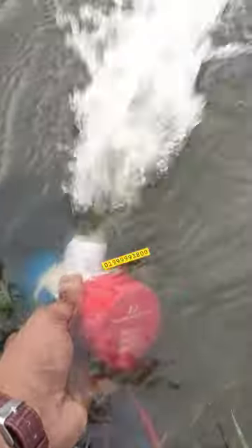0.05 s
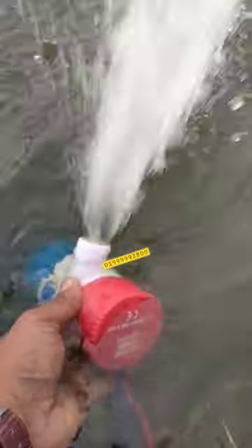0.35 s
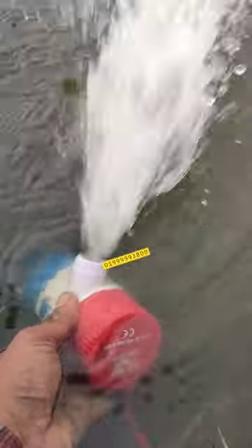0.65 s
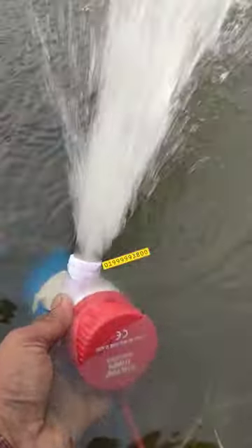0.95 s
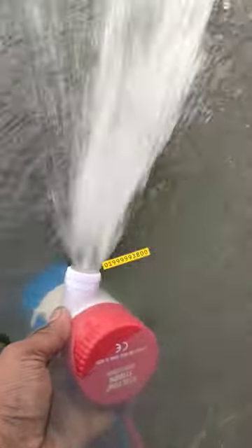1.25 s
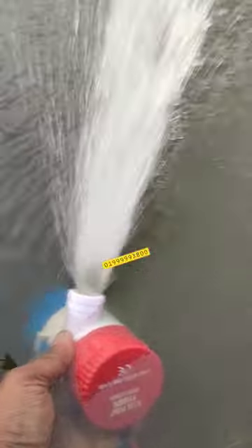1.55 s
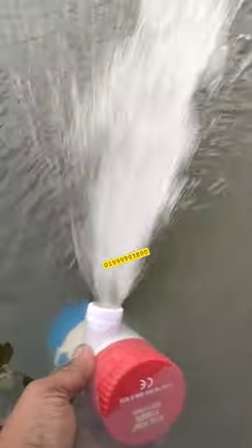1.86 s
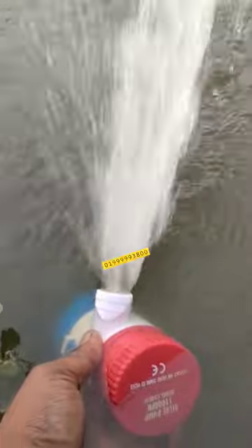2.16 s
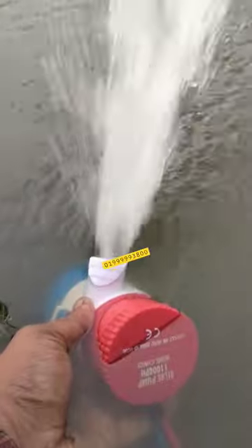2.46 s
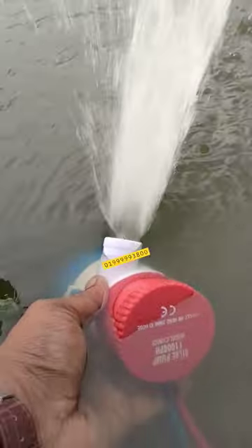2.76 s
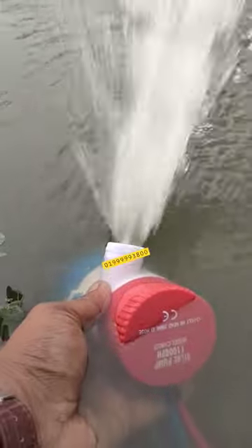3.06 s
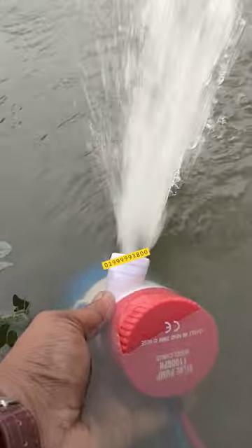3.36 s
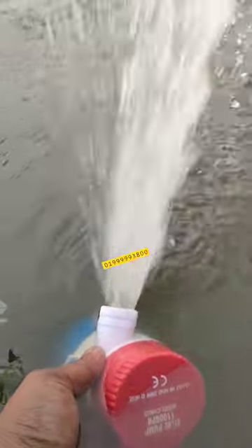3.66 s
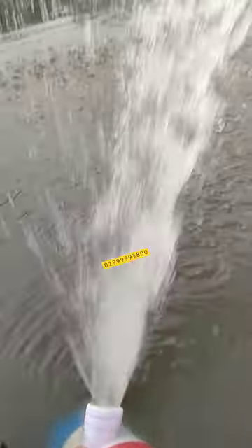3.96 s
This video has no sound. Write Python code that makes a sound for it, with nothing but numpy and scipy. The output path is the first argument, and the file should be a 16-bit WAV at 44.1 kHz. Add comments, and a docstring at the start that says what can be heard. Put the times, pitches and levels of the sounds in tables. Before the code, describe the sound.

A water jet bursts out close by, churning, gulping and splatting through the first second. At about 1 second the muffled right side of the microphone pops clear with a few low thumps. From there to 4 seconds the jet is a steady rushing spray, with hiss, bubbling and scattered drops slapping the pond, over the whine and light rattle of an electric pump.

```python
"""Water churns, gulps and splats as the nozzle of a hand-held electric pump clears a pond.
The jet settles into a rushing spray of drops, bubbles and mist, over the whine of the motor
and the rattle of the impeller in its casing. The right port of the nearby microphone is
covered for the first second and pops clear with a few low thumps."""
import sys
import numpy as np
from scipy import signal
from scipy.fft import rfft, irfft
from scipy.io import wavfile
from scipy.ndimage import uniform_filter1d, map_coordinates

SR = 44100
rng = np.random.default_rng(int(sys.argv[2]) if len(sys.argv) > 2 else 0)


def waveform_to_disk(signal):
    """Save audio, clipped to [-1, 1], as 16-bit WAV at the path in sys.argv[1]."""
    frames = np.transpose(np.atleast_2d(signal))
    scaled = np.clip(frames, -1, 1) * 32767
    samples = np.round(scaled).astype(np.int16)
    wavfile.write(sys.argv[1], SR, samples)


N = 176400
TIME_S = np.arange(N) / SR
BIN_HZ = np.maximum(np.arange(N // 2 + 1) * SR / N, 1)


def undb(db):
    """Decibels to gain."""
    return 10 ** (np.asarray(db) / 20)


def curve(rows):
    """Gain per sample from (time [s], level [dB])."""
    return undb(np.interp(TIME_S, *np.array(rows).T))


def response(points):
    """Gain per bin from (frequency [Hz], gain [dB])."""
    hz, db = np.array(points).T
    return undb(np.interp(np.log(BIN_HZ), np.log(hz), db))


def colour(x, points):
    """Filter by response(points), rolling off beyond both ends."""
    skirts = np.minimum(BIN_HZ / points[0][0], 1) * np.minimum(points[-1][0] / BIN_HZ, 1)
    return irfft(rfft(x) * response(points) * skirts ** 2, N)


def ring(x, hz, width_hz):
    """Two identical resonators in series."""
    return irfft(rfft(x) / (1 + 1j * (BIN_HZ - hz * hz / BIN_HZ) / width_hz) ** 2, N)


def unit(x):
    """Scale to rms 1."""
    return x / np.sqrt(np.mean(x ** 2))


def walk(rate_hz):
    """Smooth random drift, rms 1."""
    span = max(int(SR / rate_hz), 2)
    smoothed = uniform_filter1d(rng.standard_normal(N), span, mode="wrap")
    return unit(uniform_filter1d(smoothed, span // 2, mode="wrap"))


def patter(per_s, spread_db):
    """Dense impacts of unequal size."""
    hits = (rng.random(N) < per_s / SR) * rng.standard_normal(N)
    return unit(hits * undb(spread_db * rng.standard_normal(N)))


def wide_patter(per_s, spread_db, alike_hz):
    """Impacts over a wide area: the two ports agree on the lows only."""
    shared, left, right = (rfft(patter(per_s, spread_db)) for _ in range(3))
    alike = 1 / (1 + (BIN_HZ / alike_hz) ** 2)
    return irfft(np.sqrt(alike) * shared + np.sqrt(1 - alike) * np.array([left, right]), N)


def flicker(x, depth_db, rate_hz):
    """Each octave swells and sinks on its own."""
    octave = np.clip(np.log2(BIN_HZ / 200), 0, 6)
    spectrum = rfft(x)
    bands = (irfft(spectrum * np.maximum(1 - abs(octave - k), 0), N) for k in range(7))
    return sum(band * undb(depth_db * walk(rate_hz)) for band in bands)


def swell(at_s, length_s):
    """Gaussian envelope, peak 1."""
    return np.exp(-2 * ((TIME_S - at_s) / length_s) ** 2)


def chirps(count, centre_hz, octaves, cycles, spread_db, glide, lag_s):
    """Scattered tones ring briefly and rise in pitch, each from its own direction."""
    when, place = rng.random((count, 2)).T
    pitch, size = rng.standard_normal((count, 2)).T
    hz = np.clip(centre_hz * 2 ** (octaves * pitch), 300, 7000)[:, None]
    gain = undb(spread_db * np.minimum(size, 2))[:, None]
    k = np.arange(min(int(cycles / centre_hz * SR), 2000))
    turns = hz * k / SR
    age = np.minimum(turns / cycles, 2)  # 1 at -60 dB
    wave = gain * np.exp(-np.log(1000) * age) * np.sin(2 * np.pi * turns * (1 + glide * age))
    wave = np.diff(wave, axis=1, prepend=0) / hz
    starts = [(when * N + side * (place - .5) * lag_s * SR).astype(int) for side in (1, -1)]
    ports = [np.bincount(((start[:, None] + k) % N).ravel(), wave.ravel(), N) for start in starts]
    return unit(np.array(ports))


# Churn, strongest with the nozzle low in the water (time [s], level [dB])
CHURN_LEVEL = [(0,-33.5),(.05,-32),(.09,-20.5),(.27,-21.5),(.37,-26),(.48,-23),(.55,-28),(.62,-24),(.9,-26),(1.1,-27),(1.4,-35),(2.3,-35),(2.8,-29),(4,-32.5)]
# Churn spectrum (frequency [Hz], gain [dB])
CHURN_SPECTRUM = [(450,-45),(850,-12),(1250,7.5),(1800,8.5),(2600,5.5),(4000,6.5),(6000,-21)]
# Air in the jet (time [s], length [s], level [dB], centre [Hz])
GULPS = [(0.1,0.048,-30,1190),(0.213,0.041,-26.5,900),(0.295,0.061,-27.5,800),(0.454,0.029,-31,860),(0.712,0.025,-26,824),(0.775,0.016,-29,870),(0.849,0.029,-28,810),(2.122,0.018,-33.5,586)]


def churn():
    """Water and air tumble around the nozzle, with separate hollow gulps."""
    tumble = colour(wide_patter(per_s=4000, spread_db=3.7, alike_hz=1600), CHURN_SPECTRUM)
    out = unit(flicker(tumble, depth_db=4.5, rate_hz=35)) * curve(CHURN_LEVEL)
    air = wide_patter(per_s=5000, spread_db=2.2, alike_hz=2200)
    for at_s, length_s, db, hz in GULPS:
        out += undb(db) * swell(at_s, length_s) * unit(ring(air, hz, width_hz=1.3 * hz))
    return out


# Pond wash spectrum (frequency [Hz], gain [dB])
WASH_SPECTRUM = [(25,-7.5),(100,-13),(190,-0.5),(330,-4.5),(650,-1.5),(850,0.5),(1020,-5.5),(1500,5),(3000,-38)]


def wash():
    """Water falls back with a low slosh."""
    slosh = colour(wide_patter(per_s=2500, spread_db=1.05, alike_hz=1270), WASH_SPECTRUM)
    return undb(-37.5) * unit(flicker(slosh, depth_db=3.0, rate_hz=53))


# Motor whine (shaft harmonic [1], level [dB], right port lag [rad])
WHINE_PARTIALS = [(3,-50,0.98),(7,-50.5,1.05),(8,-40,0.8),(9,-44,-2),(11,-40.5,0.7),(12,-38.5,0.6)]
# Pump rising out of the water (time [s], gain [dB])
PUMP_LEVEL = [(0,-6),(.45,-13),(.6,4),(.75,-11),(.93,-2.5),(1.4,0),(1.8,1.5),(2.2,-1),(2.6,2),(2.78,3),(3.1,.5),(4,.3)]


def pump(shaft_hz=156.35, casing_hz=1845, warble_hz=74.85):
    """Shaft harmonics whine; the impeller rattles the casing once a turn and makes it warble."""
    shaft_rad = 2 * np.pi * np.cumsum(shaft_hz * (1 + .0015 * walk(2.9))) / SR
    right_only = np.array([[0], [1]])
    whine = 0
    for harmonic, db, lag_rad in WHINE_PARTIALS:
        peak = np.sqrt(2) * undb(db + 1.65 * walk(11))
        whine += peak * np.sin(harmonic * shaft_rad + rng.uniform(0, 2 * np.pi) - lag_rad * right_only)
    knocks = wide_patter(per_s=6000, spread_db=3.4, alike_hz=2800)
    knocks *= undb(7.0 * np.cos(shaft_rad) + 2 * walk(70))
    rattle = undb(-34.5) * unit(ring(knocks, casing_hz, width_hz=265))
    casing_rad = 2 * np.pi * np.cumsum(casing_hz + warble_hz * walk(90.75)) / SR
    flutter = undb(4.2 * walk(68) + 1.5 * np.cos(shaft_rad))
    warble = undb(-32) * unit(np.sin(casing_rad - right_only) * flutter)  # right lags 1 rad
    return (whine + rattle + warble) * curve(PUMP_LEVEL)


# Jet strength (time [s], level [dB])
JET_LEVEL = [(0,-42),(.052,-31),(.08,-20),(.125,-27.5),(.2,-26),(.32,-28),(.37,-21.5),(.43,-22.3),(.52,-28),(.85,-27),(1.25,-30),(1.6,-28.5),(1.8,-25),(2.15,-26.5),(2.4,-27.5),(2.7,-30),(3.1,-27),(3.6,-28.5),(4,-32.5)]
# Fine drop spectrum (frequency [Hz], gain [dB])
DROP_SPECTRUM = [(700,-17),(1400,-8.5),(2050,-4.5),(2400,5.5),(2800,-6),(3300,-5.5),(4000,0.5),(5100,-0.5),(5900,-4),(7500,-16.5),(8200,-26.5)]


def spray():
    """The sputtering jet breaks into drops; faint, brief tones around 4 kHz ring through the hiss."""
    drops = colour(wide_patter(per_s=9000, spread_db=.47, alike_hz=4900), DROP_SPECTRUM)
    drops = unit(flicker(drops, depth_db=1.2, rate_hz=24))
    fizz = chirps(3500, centre_hz=4300, octaves=.2315, cycles=51, spread_db=6, glide=.041, lag_s=3e-4)
    tones = chirps(450, centre_hz=4022, octaves=.35, cycles=520, spread_db=3, glide=.0685, lag_s=3.4e-4)
    sputter = undb(.32 * walk(41))
    rush = undb(-1.5) * drops + undb(-2.5) * shimmer() + undb(-9) * fizz + undb(-5.5) * tones
    return rush * sputter * curve(JET_LEVEL)


def shimmer(per_s=210, decay_s=.007, low_hz=2690, high_hz=7674, bands=16):
    """Narrow bands of hiss flare briefly at random, so the treble shifts and shimmers."""
    hiss = colour(wide_patter(per_s=9000, spread_db=.33, alike_hz=4900), DROP_SPECTRUM)
    fade = rfft(np.exp(-TIME_S / decay_s))
    out = 0
    for hz in np.geomspace(low_hz, high_hz, bands):
        flares = 1. * (rng.random(N) < per_s / bands / SR)
        power = irfft(rfft(flares) * fade, N)
        out += ring(hiss, hz, width_hz=380) * np.sqrt(abs(power))
    return unit(out)


def ticks(per_s=70, spread_db=5):
    """Lone drops strike close by with a dry tick."""
    size = undb(spread_db * rng.uniform(-1.1, 1, (2, N)))
    hits = (rng.random(N) < per_s / SR) * size * np.sign(rng.standard_normal(N))
    return undb(-8.5) * unit(colour(hits, DROP_SPECTRUM)) * curve(JET_LEVEL)


# Mist hiss (time [s], level [dB])
MIST_LEVEL = [(0,-48),(.05,-47),(.09,-40),(.17,-44),(.22,-50),(.7,-45.5),(1.1,-44),(1.4,-46.5),(1.85,-42.5),(2.5,-46),(3.3,-45.5),(4,-45.5)]
# Mist spectrum (frequency [Hz], gain [dB])
MIST_SPECTRUM = [(7500,-17),(8600,4),(11000,5.5),(12200,0),(15000,-3)]
# Spits of air (time [s], length [s], level [dB], centre [Hz])
SPITS = [(0.095,0.023,-42,9500),(0.116,.011,-41,12700)]


def mist():
    """The finest droplets hiss, with a rising spit as the nozzle breaks the surface."""
    hiss = colour(wide_patter(per_s=30000, spread_db=.6, alike_hz=1600), MIST_SPECTRUM)
    out = unit(hiss) * undb(2.7 * walk(35)) * curve(MIST_LEVEL)
    for at_s, length_s, db, hz in SPITS:
        out += undb(db) * swell(at_s, length_s) * unit(ring(hiss, hz, width_hz=3000))
    return out


# Bubbling where the jet lands (time [s], level [dB])
BUBBLING_LEVEL = [(0, -52), (0.05, -37), (0.085, -30), (0.17, -41), (0.24, -25), (0.47, -26), (0.56, -26.5),
                  (0.75, -29), (0.95, -31), (1.3, -36), (1.75, -29), (2.3, -34), (2.56, -26), (3.2, -29),
                  (3.65, -28), (4, -33.5)]


def bubbling():
    """Air driven under the surface rings as a swarm of bubbles."""
    swarm = chirps(4500, centre_hz=3100, octaves=.206, cycles=30,
                   spread_db=-1.5, glide=.038, lag_s=2.2e-4)
    return undb(-.5 + .86 * walk(33)) * swarm * curve(BUBBLING_LEVEL)


# Large drops (time [s], level [dB], decay [s], centre [Hz])
SPLATS = [(.079,-17,0.0084,4330),(0.086,-19,0.0079,2100),(0.137,-25,.006,3000),(.238,-14,0.0078,2700),(.308,-29,.006,3000),(0.475,-22,.014,3000),(0.728,-16.5,0.011,2600),(0.852,-31,.005,2600),(0.939,-22,.005,3700),(1.895,-19,.007,2800),(2.05,-22,.005,4400),(2.08,-22,.005,4200),(2.19,-20,0.0068,2200),(2.425,-22,.006,2400),(2.879,-17.5,0.0074,4070),(3.183,-18,.004,3400),(3.214,-22,0.026,3700),(3.505,-14,0.0066,2540),(3.609,-20,0.006,2810),(3.851,-20,.005,2200)]
# Common splat spectrum (frequency [Hz], gain [dB])
SPLAT_SPECTRUM = [(800,-22),(1600,7),(5000,-4),(7500,-6),(14000,-33)]


def splats():
    """Larger drops slap down nearby, deep or bright by their size."""
    burst = colour(wide_patter(per_s=22000, spread_db=.55, alike_hz=3800), SPLAT_SPECTRUM)
    out = 0
    for at_s, db, decay_s, hz in SPLATS:
        envelope = (TIME_S >= at_s) * np.exp(-abs(TIME_S - at_s) / decay_s)
        out += undb(db) * envelope * unit(ring(burst, hz, width_hz=1.14 * hz))
    return out


# Right port pops (time [s], level [dB], pitch [Hz], snap level [dB])
THUMPS = [(0.271,-13,30,-28),(1.007,-16,80,-7),(1.026,-3.5,53,-1),(1.0647,-16,62,-0.5),(1.094,-18,62,0.5),(1.1257,-20.5,62,-5)]
# Snap spectrum (frequency [Hz], gain [dB])
SNAP_SPECTRUM = [(150,-7),(700,15.5),(1300,9.5),(4000,-5),(7000,-15),(14000,-27)]


def thumps(swing_cycles=.79, suck_s=.0016, snap_s=.00018, snap_hz=2390):
    """Each pop at the port is a sharp snap and a short suck, then a heavily damped swing."""
    lows, snaps = 0, 0
    for at_s, db, hz, snap_db in THUMPS:
        age_s = np.maximum(TIME_S - at_s, 0)
        swing = np.sin(2 * np.pi * age_s * hz) * np.exp(-(age_s * hz / swing_cycles) ** 2)
        suck = np.exp(-((TIME_S - at_s) / suck_s) ** 2)
        lows += undb(db) * (.66 * swing - .57 * suck)
        snap = (TIME_S >= at_s) * np.exp(-age_s / snap_s) * np.cos(2 * np.pi * snap_hz * age_s)
        snaps -= undb(snap_db) * snap
    return lows + colour(snaps, SNAP_SPECTRUM)


# Left port's lead as the microphone turns (time [s], lead [ms])
LEFT_LEAD = [(0,0.23),(.9,0.1),(1.4,0.05),(2.2,0.025),(3,0.056),(4,0.023)]
# Reflection off the pond (time [s], gain [dB])
POND_ECHO = [(0,-16),(2.3,-15.5),(2.8,-20),(4,-6)]


def from_jet(x, pond_ms=1.009, hand_ms=2.3):
    """Water sound reaches the left port first, and again off the pond and the swaying hand."""
    n = np.arange(N)
    lead = np.interp(TIME_S, *np.array(LEFT_LEAD).T) * SR / 1000
    pond = pond_ms * (1 + .068 * walk(1.5)) * SR / 1000
    hand = hand_ms * (1 + .044 * walk(2)) * SR / 1000
    paths = [(0, 1), (pond, curve(POND_ECHO)), (hand, undb(-15.5))]
    out = np.zeros((2, N))
    for port, lag in enumerate((0, lead)):
        for delay, gain in paths:
            out[port] += gain * map_coordinates(x[port], [n - lag - delay], order=3, mode="wrap")
    return out


# Cancellation at the notch centre (time [s], gain [dB])
NOTCH_GAIN = [(0,0.5),(2.1,-5),(2.6,-7.5),(3.2,-14),(4,-18)]


def notch(x):
    """A narrow band cancels more and more as the microphone moves over the pump."""
    depth = 1 - curve(NOTCH_GAIN)
    return x - depth * ring(x, hz=2430, width_hz=700)


def scene():
    """Water and pump together, in stereo."""
    water = from_jet(spray() + ticks() + bubbling() + churn() + wash())
    return notch(water + pump()) + from_jet(splats()) + mist()


# Open right port against the left (frequency [Hz], gain [dB])
PORT_OPEN = [(600,0.5),(1000,-1.5),(1400,-3),(1750,-1.5),(2050,0),(2600,1.5),(3400,2),(4000,0.5),(4900,2.5),(6200,0),(7500,3.5),(9000,-3),(13000,-1)]
# Covered right port (frequency [Hz], gain [dB])
PORT_COVERED = [(100,5.5),(600,-2.5),(1100,1.5),(1400,1.5),(1850,-2),(2150,0.5),(2620,7),(3100,-6),(3400,4.5),(3700,-6),(4150,4.5),(4450,-2),(4950,-1.5),(5500,-15),(8000,-12),(14000,-12)]


def record(dry, clears_at_s=1.016, clearing_s=.06, low_hz=10, top_hz=14900):
    """The right port is dull and resonant until it pops clear; rumble and top are cut on both."""
    clear = np.clip((TIME_S - clears_at_s) / clearing_s + .5, 0, 1)
    free, covered = (irfft(rfft(dry[1]) * response(port), N) for port in (PORT_OPEN, PORT_COVERED))
    right = clear * free + (1 - clear) * covered + thumps()
    highpass = signal.butter(1, low_hz, "high", fs=SR, output="sos")
    lowpass = signal.ellip(10, .2, 80, top_hz, fs=SR, output="sos")
    return signal.sosfilt(lowpass, signal.sosfilt(highpass, np.array([dry[0], right])))


dry = scene()
out = record(dry)
waveform_to_disk(out)
```